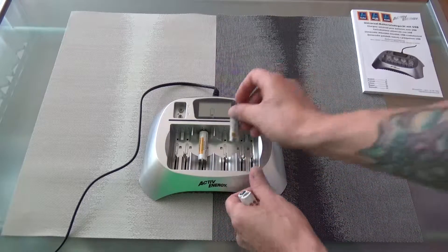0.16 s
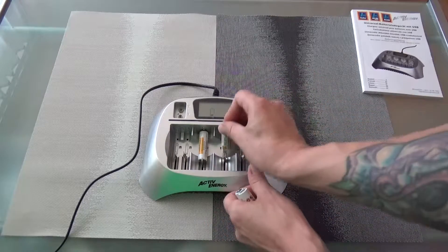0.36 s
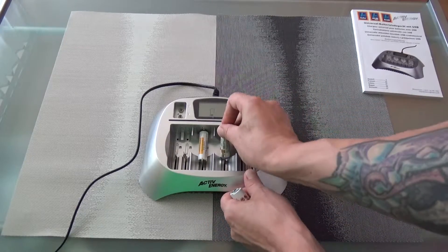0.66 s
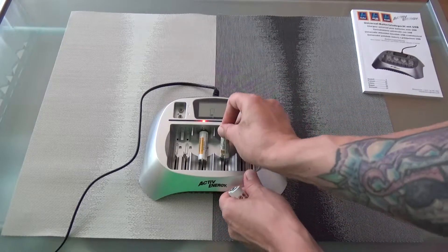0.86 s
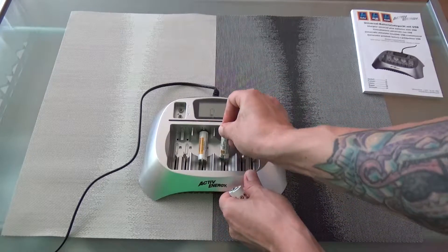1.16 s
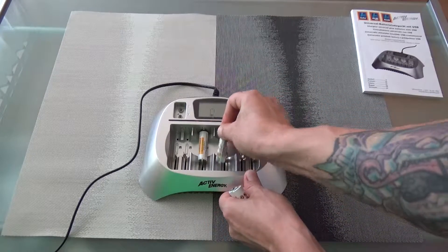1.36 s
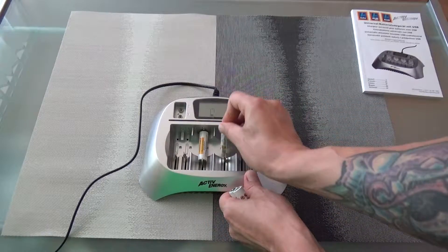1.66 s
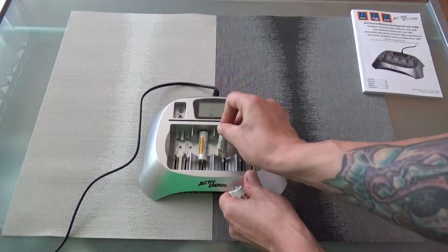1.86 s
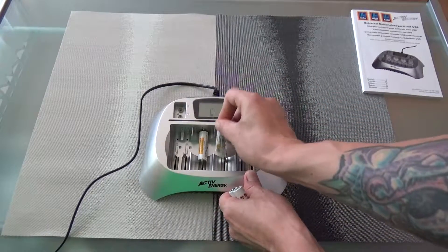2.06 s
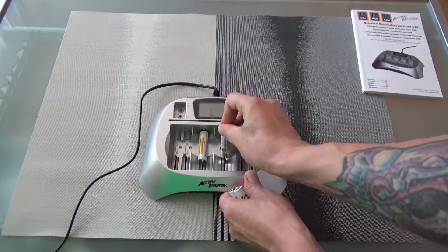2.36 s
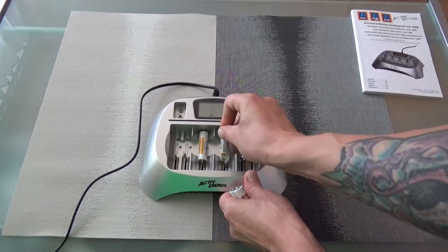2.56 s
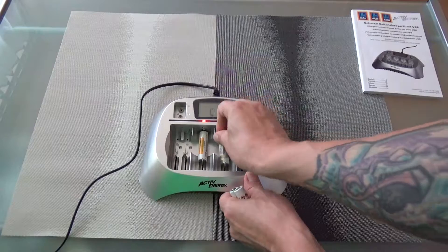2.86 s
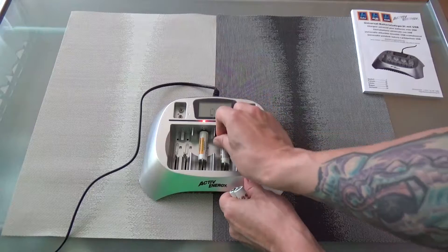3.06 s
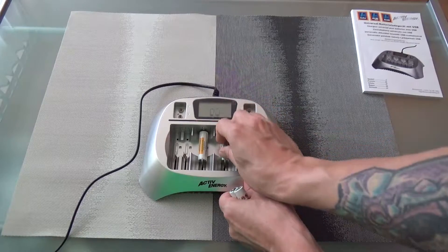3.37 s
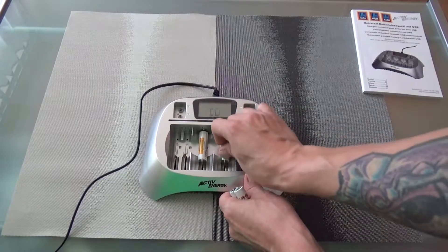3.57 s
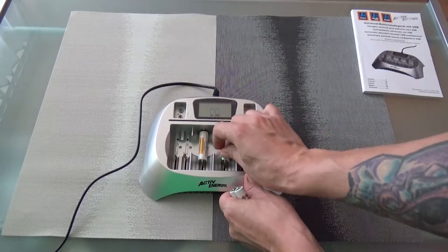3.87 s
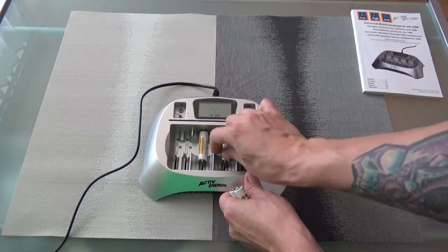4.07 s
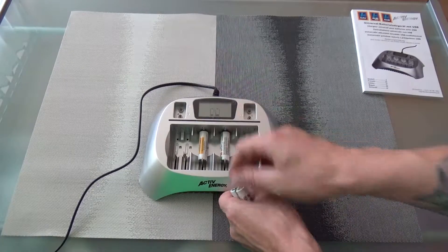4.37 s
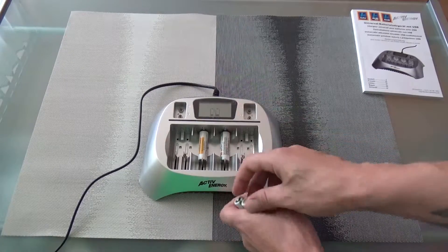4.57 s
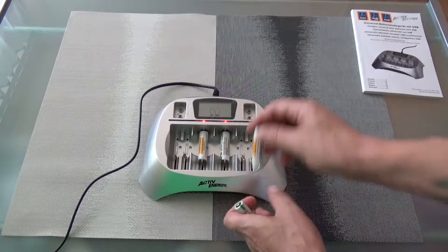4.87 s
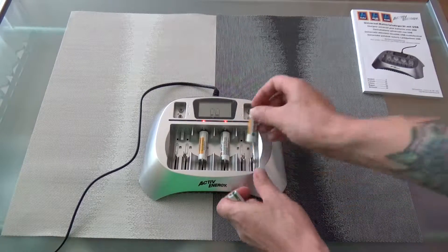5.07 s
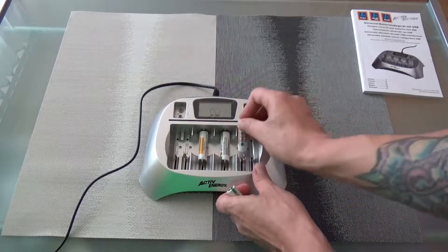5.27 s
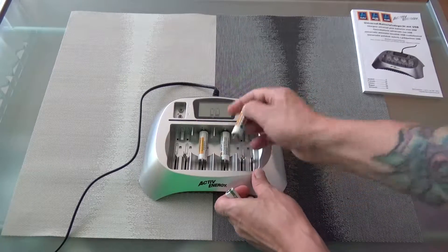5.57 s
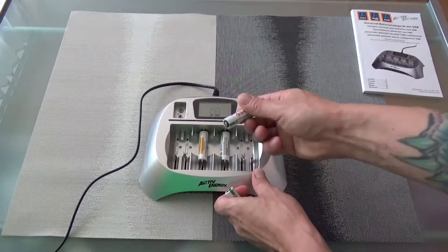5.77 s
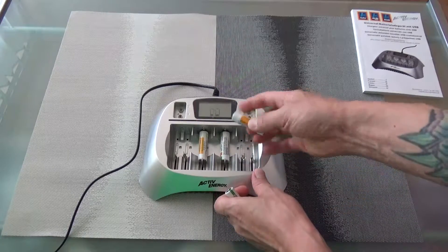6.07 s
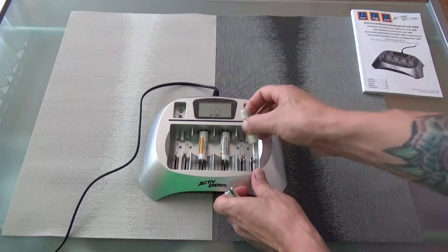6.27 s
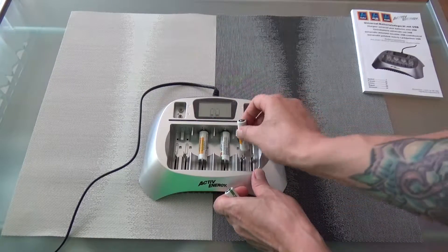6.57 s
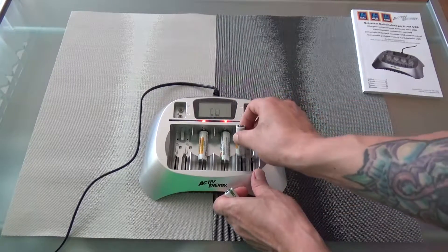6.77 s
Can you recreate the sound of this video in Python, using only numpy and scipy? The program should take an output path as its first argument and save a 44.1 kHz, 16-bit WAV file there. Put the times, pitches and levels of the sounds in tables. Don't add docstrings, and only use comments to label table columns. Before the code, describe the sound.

Close plastic and metal clacks as cells snap into a charger indoors, first in a busy cluster, then sparse handling and a final hard clack.

```python
import sys
import numpy as np
from scipy import signal
from scipy.fft import rfft, irfft, next_fast_len
from scipy.io import wavfile
from scipy.ndimage import uniform_filter1d, map_coordinates

SR = 44100
rng = np.random.default_rng(int(sys.argv[2]) if len(sys.argv) > 2 else 0)


def pcm_store(signal):
    levels = np.round(np.clip(np.atleast_2d(signal), -1, 1) * 32767)
    wavfile.write(sys.argv[1], SR, levels.astype(np.int16).T)


def natural_amplitude(level_db):
    exponent = np.asarray(level_db, float) / 20
    return 10 ** exponent


N = 304731
TIME = np.arange(N) / SR

# f/Hz, t60/s, level/dB
TABLE_MODES = [(215, 0.041, -3), (245, 0.15, -7), (285, 0.14, -4), (335, 0.09, -1.5), (380, 0.08, -4.5),
               (402.3, 0.068, -5), (476.4, 0.047, -1.5), (658, 0.048, -7.5)]
# f/Hz, density/dB per Hz
SPRING_COLOUR = [(4000, -19), (7000, -33), (10000, 9), (13000, 1), (16000, -1)]


def unit(x):
    return x / np.sqrt(np.mean(x ** 2) + 1e-20)


def peak_one(x):
    return x / np.max(np.abs(x))


def place(track, s, sound):
    track[round(s * SR):][:len(sound)] += sound


def along(points, hz, column=1):
    points = np.transpose(points)
    return np.interp(np.log(hz + 1), np.log(points[0] + 1), points[column])


def curves(rows, outside=None):
    s, *columns = np.transpose(rows)
    return [np.interp(TIME, s, column, outside, outside) for column in columns]


def wobble(rate):
    return map_coordinates(rng.standard_normal(int(N * rate / SR) + 4), [TIME * rate])


def filtered(x, response):
    m = next_fast_len(N + SR // 2)
    return irfft(rfft(x, m) * response(np.fft.rfftfreq(m, 1 / SR)), m)[..., :N]


def tone(hz):
    return np.sin(2 * np.pi * np.cumsum(hz) / SR)


def noise(spectrum, lo_hz, hi_hz):
    def band(hz):
        return natural_amplitude(along(spectrum, hz)) / (1 + (lo_hz / (hz + 1)) ** 4) / (1 + (hz / hi_hz) ** 4)
    return unit(filtered(rng.standard_normal(N), band))


def ringing(modes, t, slower, scatter_db, attack):
    hz, t60, db = np.transpose(modes)[:, :, None]
    chance = rng.standard_normal((3, len(modes), 1))
    level = natural_amplitude(db + scatter_db * chance[0] - 60 * t / (t60 * slower))
    pitch = hz * (1 + scatter_db / 100 * chance[1])
    ring = np.sum(level * np.sin(2 * np.pi * pitch * t + chance[2]), 0)
    return peak_one(ring * (1 - np.exp(-t / attack)))


def dying(stock, t, t60, attack):
    burst = stock[rng.integers(N - len(t)):][:len(t)]
    return peak_one(burst * natural_amplitude(-60 * t / t60) * (1 - np.exp(-t / attack)))


def contacts():
    # t/s, level/dB, loudest shell mode f/Hz, slider/dB, spread/dB
    blow_rows = [(0.469, -12, 2600, -6.5, 3.5), (0.497, -16.5, 3400, -18, 3.5), (0.742, -17, 1700, -14, -6),
                 (0.784, -18, 1600, -16.5, -2.5), (0.808, -19, 1110, -0.5, -5.5),
                 (1.005, -20.5, 1510, -12.5, -6.5), (1.336, -21.5, 2000, -12, 11),
                 (1.347, -11.5, 1965, 3, -6), (1.494, -13.5, 1890, -24, -5),
                 (1.558, -15.5, 2060, -1.5, -0.5), (1.747, -10, 1750, -9, 1), (1.761, -17, 1700, 1.5, 6.5),
                 (1.878, -14.5, 2550, -1, 7.5), (1.891, -9, 2030, -8, -4), (1.969, -15.5, 1620, -28, .5),
                 (2.081, -13, 2100, -12.5, 1.5), (2.31, -10, 1976, -13.5, 0),
                 (2.543, -16.5, 1250, -10.5, -5), (2.97, -19, 2300, -13.5, -5),
                 (3.005, -12.5, 980, -6.5, 0), (3.2235, -17, 2150, -6.5, -5),
                 (5.226, -19.5, 1315, -8.5, -3.5), (6.783, -10, 1760, -9, 4), (6.8675, -14, 1850, -10, 0)]
    # t/s, level/dB, f/Hz, slider/dB
    chatter_rows = [(0.471, -17.5, 1830, -2), (0.744, -24, 1170, -14), (0.507, -17.5, 890, -4),
                    (0.514, -21, 1045, -21), (1.343, -15, 1690, -4.5), (1.354, -15, 2100, 3.5),
                    (1.554, -16.5, 2470, -9), (1.579, -20, 1800, -21.5), (1.752, -15, 2460, -0.5),
                    (1.757, -16, 1950, 4.5), (1.769, -22, 2100, -29), (2.307, -17, 1900, -5.5),
                    (3.019, -24, 1300, -30), (6.79, -12, 1840, -8), (6.797, -17, 1150, -19),
                    (6.8695, -10, 1650, -13), (6.8725, -15, 1500, -12), (6.801, -21, 1200, -10),
                    (3.225, -22, 1090, -20), (2.544, -18, 1260, -20), (1.356, -12, 2300, 6)]
    # t/s, level/dB, f/Hz, slider/dB
    tap_rows = [(0.181, -40.5, 3000, -6), (0.186, -43, 2320, -6), (0.361, -41.5, 1790, -4.5),
                (0.68, -37, 1600, -24.5), (1.184, -35.5, 1000, -12.5), (2.482, -30, 2480, -1.5),
                (2.72, -39.5, 1520, -2), (2.817, -33, 1070, 1.5), (3.187, -35, 1050, -10),
                (3.317, -36, 1920, -3.5), (3.483, -43.5, 1030, -2), (3.509, -41, 1730, -4),
                (3.942, -51, 1030, -7), (4.285, -36, 1290, -16), (4.389, -41.5, 1340, 1),
                (4.405, -46, 1230, -13), (4.708, -48, 860, -3), (5.274, -29.5, 1480, -2),
                (5.596, -37, 1080, -25), (6.4, -35.5, 1400, -4.5), (6.432, -50, 885, -22),
                (6.599, -45, 1550, -4)]
    # t/s, level/dB
    tick_rows = [(.655, -40), (.733, -45), (1.076, -54), (1.098, -47), (1.178, -51), (1.253, -52.5),
                 (1.326, -33.5), (1.865, -33), (2.288, -44), (3.164, -36.5), (3.205, -42), (.465, -32),
                 (1.744, -36), (3.222, -40), (5.22, -56), (5.26, -46), (2.54, -39), (1.002, -44),
                 (2.898, -35), (6.78, -33)]
    hard = []
    for s, db, hz, bright_db, spread_db in blow_rows:
        thud_db = -40 + 0.94 * (db + 12.5) - db
        hard.append((s, db, hz, bright_db, thud_db, spread_db))
    loose = [(*row, -26, -6.5) for row in chatter_rows]
    soft = [(*row, -23.5, -1.5) for row in tap_rows]
    light = [(s, db, 1700, -9, -25, -2) for s, db in tick_rows]
    return hard + loose + soft + light


def hollows(hz):
    # f/Hz, width/Hz, gain/dB
    slot_bands = [(1080, 250, 2), (1850, 350, 2), (3400, 700, 3)]
    return natural_amplitude(sum(db / (1 + (2 * (hz - centre) / width) ** 2) for centre, width, db in slot_bands))


def table_flexing():
    # t/s, level/dB, f/Hz
    bump_rows = [(0.473, -34.5, 145.5), (0.748, -37.5, 132), (1.01, -46.5, 142.4), (1.348, -46, 168),
                 (1.42, -38, 153), (1.765, -36.5, 116), (2.079, -62, 168), (2.544, -41, 158.7),
                 (3.01, -38, 156), (3.211, -52, 112), (5.279, -38, 113), (6.791, -40, 141),
                 (.512, -34.5, 328),
        (.812, -36, 335),
        (.81, -38, 280),
        (1.009, -43.5, 291),
        (2.312, -35.5, 285),
        (2.546, -38, 277),
        (2.546, -39, 245),
        (3.006, -34, 957),
    ]
    out, t = np.zeros(N + SR), np.arange(SR // 5) / SR
    for s, db, hz in bump_rows:
        slower = np.clip(0.54 * (300 / hz) ** 0.13, .2, .75)
        place(out, s, natural_amplitude(db - 1.0) * ringing([(hz, .2, 0)], t, slower, scatter_db=0, attack=0.0022))
    return out


def panels():
    # t/s, level/dB, f/Hz, t60/s
    ring_rows = [(.742, -40, 650, .05), (.786, -37, 770, .08), (.81, -38, 1082, .45), (.87, -59, 4495, .4),
                 (1.008, -43, 1040, .1), (2.971, -30, 880, .03), (1.095, -51, 1000, .08),
                 (2.545, -27, 1211, .05), (2.545, -30, 1303, .06), (2.546, -43, 603, .15),
                 (2.546, -38, 310, .2), (3.226, -28, 1093, .05), (3.227, -39, 781, .06),
                 (3.27, -46, 420, .08), (6.805, -33, 1030, .3), (6.805, -29, 1860, .3),
                 (6.8, -36, 3200, .2), (6.874, -31, 1030, .08)]
    out, t = np.zeros(N + SR), np.arange(SR // 5) / SR
    for s, db, hz, t60 in ring_rows:
        pair = [(hz, 1, 0), (hz * 1.025, .6, -5)]
        place(out, s, natural_amplitude(db) * ringing(pair, t, t60, scatter_db=0, attack=.002) * (1 - t / t[-1]))
    return out


def knocks():
    # f/Hz, density/dB per Hz
    shell_colour = [(300, -30.5), (700, -8.5), (1000, -1), (1800, 2.5), (2600, 0), (3600, -2),
                    (4600, -10.5), (6000, -24)]
    # f/Hz, density/dB per Hz
    slider_colour = [(3500, -13), (4800, -4), (5900, 1), (7000, -4), (8500, -10), (11000, -12.5),
                     (14000, -21.5), (16000, -33.5)]
    shell = filtered(noise(shell_colour, 260, 6100), hollows)
    slider = noise(slider_colour, 2700, 26000)
    out, low, blows = panels(), table_flexing(), np.zeros((2, N))
    t = np.arange(SR // 5) / SR
    for s, db, hz, bright_db, thud_db, spread_db in contacts():
        body = dying(shell, t, .017, attack=.001)
        body = body + .75 * ringing([(hz, .015, 0)], t, 1, scatter_db=0, attack=.0005)
        rattle = dying(slider, t, .013, attack=.0009)
        thud = ringing(TABLE_MODES, t, 0.83, scatter_db=3.0, attack=0.0053)
        place(out, s, natural_amplitude(db - 2.5) * (body + natural_amplitude(bright_db + 3) * rattle))
        place(low, s, natural_amplitude(db + thud_db) * thud)
        blows[:, round(s * SR)] += natural_amplitude(db + spread_db + np.array([21, 18.5 + bright_db]))

    def all_round(hz):
        return natural_amplitude([along(shell_colour, hz) - 1.4, along(slider_colour, hz)]) * [hollows(hz), hz ** 0]
    even = filtered(blows, all_round).sum(0)
    return (out + low)[:N], even + low[:N] + .2 * out[:N]


def thuds():
    # t/s, level/dB
    thud_rows = [
        (.5, -30.5),
        (.785, -37),
        (.809, -36),
        (1.006, -39),
        (1.44, -34),
        (1.97, -37.5),
        (2.308, -40),
        (2.544, -32),
        (2.818, -46.5),
        (5.277, -54),
    ]
    # t/s, level/dB
    snap_rows = [(0.469, -43), (1.349, -15.5), (1.558, -26), (1.879, -23), (2.081, -44), (2.896, -31),
                 (3.004, -32), (4.389, -41), (5.228, -27.5), (5.26, -46), (5.275, -33.5)]
    out, t, spring = np.zeros(N + SR), np.arange(SR // 5) / SR, noise(SPRING_COLOUR, 3000, 20000)
    for s, db in thud_rows:
        place(out, s, natural_amplitude(db) * ringing(TABLE_MODES, t, 0.98, scatter_db=4.5, attack=0.0049))
    for s, db in snap_rows:
        place(out, s, natural_amplitude(db) * dying(spring, t, 0.01, attack=0.00037))
    return out[:N]


def clinks():
    # t/s, level/dB, f/Hz, upper mode/dB, t60/s
    clink_rows = [(0.18, -28, 5800, -10, 0.0025), (0.1834, -46, 5700, -13, 0.008),
                  (0.1878, -34.5, 5600, -11, 0.0037), (2.895, -48, 6300, -1, 0.007),
                  (2.8959, -22, 6230, -11, 0.0066), (2.903, -31, 5800, -19, 0.012),
                  (4.5003, -19, 5650, -13, 0.005), (4.5035, -38, 5500, -14, .006),
                  (4.548, -48, 5500, -14, .008), (4.516, -47, 5500, -14, 0.009),
                  (4.5734, -48, 5400, -15, 0.01), (5.5278, -55, 5650, -12, 0.009),
                  (5.558, -54, 5430, -21, 0.009), (6.5774, -53, 5350, -3, 0.009)]
    out, wide, t = np.zeros(N + SR), np.zeros(N + SR), np.arange(SR // 8) / SR
    for s, db, hz, upper_db, t60 in clink_rows:
        can = [(hz, 1, 0), (hz * 1.25, .5, -13), (10300, .8, upper_db + 3.5), (11600, .5, upper_db - 3),
               (3350, .8, -30), (1870, 1.2, -17)]
        neighbours = [(hz * .93, 1, -3), (hz * 1.12, 1, -3)]
        gain = natural_amplitude(db + 2.5)
        place(out, s, gain * ringing(can, t, max(t60, .004), scatter_db=0, attack=.0012))
        place(wide, s, gain * ringing(can + neighbours, t, .005, scatter_db=1, attack=.0008))
    return out[:N], wide[:N]


def scrapes():
    # f/Hz, density/dB per Hz
    dull_colour = [(180, -56), (300, -18), (566, -22.5), (929, -5.5), (2000, -4.5), (3230, 0), (5000, -4.5),
                   (7000, -28)]
    # f/Hz, density/dB per Hz
    bright_colour = [(2350, -22), (3500, -2), (4750, -7), (5900, -1.5), (7000, -6), (8300, -14),
                     (13900, -20), (16000, -32)]
    # start t/s, length/s, level/dB, brightness/dB, share spent swelling/0-1
    stroke_rows = [(0.368, 0.11, -50.5, -4, 0.77), (2.505, .04, -46, -10, .6), (2.769, 0.034, -56.5, 0, .3),
                   (2.819, 0.092, -46, 0, 0.27), (2.889, 0.052, -47, 8.5, 0.08),
                   (3.025, 0.066, -55, -17, .1), (3.119, 0.062, -48.5, 1, 0.68), (4.366, 0.032, -58, 4, .8),
                   (4.403, 0.027, -56.5, 4, 0.06), (5.284, 0.035, -49.5, 4, 0.5),
                   (5.333, 0.09, -54, -5, 0.88), (5.561, .075, -60, 0.5, 0.03), (5.72, .03, -67, 7, .5),
                   (6.536, 0.061, -56, -3, .7), (6.723, 0.046, -48, -3.5, 0.64)]
    # t/s, level/dB
    shove_rows = [
        (1.355, -30),
        (1.366, -29),
        (1.374, -22.5),
        (1.41, -23),
        (1.44, -23.5),
        (1.458, -25),
        (1.465, -29),
        (1.49, -33),
        (1.53, -35.5),
    ]
    edge_db = -19.5
    grainy = natural_amplitude(3.3 * wobble(900) + .6 * wobble(83))
    low = unit(grainy * noise(dull_colour, 630, 3640))
    high = unit(grainy * noise(bright_colour, 2330, 20000))
    skin = natural_amplitude(-6.5) * unit(grainy * noise(SPRING_COLOUR, 6000, 20000))
    paths = []
    for s, length, db, bright, swell in stroke_rows:
        peak_s = s + np.clip(swell, .02, .98) * length
        stroke = [(s, db + edge_db, bright), (peak_s, db, bright), (s + length, db + edge_db, bright)]
        paths.append((stroke, high + skin))
    hardest = max(db for s, db in shove_rows)
    shove = [(s, db, 1.5 + 0.3 * (db - hardest)) for s, db in shove_rows]
    paths.append((shove, high))
    out = np.zeros(N)
    for path, bright_part in paths:
        db, bright_db = curves(path, -150)[0], curves(path)[1]
        out += uniform_filter1d(natural_amplitude(db - 2.0), size=200) * (low + natural_amplitude(bright_db) * bright_part)
    return out


def squeak():
    # t/s, pressure/0-1
    press_rows = [
        (4.55, 0),
        (4.6, .7),
        (4.645, 1),
        (4.68, .6),
        (4.71, .3),
    ]
    # f at rest/Hz, f gained at full pressure/Hz
    skin_tones = [(7900, 550), (10000, 600), (10400, 1800)]
    pressure, = curves(press_rows)
    tones = np.zeros(N)
    for hz, gain_hz in skin_tones:
        tones += natural_amplitude(6 * wobble(35)) * tone(hz + gain_hz * pressure + 150 * wobble(200))
    touching = (TIME > press_rows[0][0]) * (TIME < press_rows[-1][0])
    return natural_amplitude(-91 + 8 * (1.5 + pressure)) * tones * touching


def creak():
    # t/s, level/dB
    creak_rows = [
        (.358, -62),
        (.4, -64),
        (.44, -61),
        (.466, -58),
    ]
    level = uniform_filter1d(natural_amplitude(curves(creak_rows, -150)[0]), size=100)
    return level * natural_amplitude(3 * wobble(60)) * tone(1855 + 70 * wobble(300))


def room(x, count=4, gap=.006):
    # f/Hz, t60/s, level/dB
    tail_rows = [(145, 0.91, -5.5), (414, 0.28, 10.5), (1000, 0.36, 4), (2740, 0.43, -0.5),
                 (6460, 0.41, -2.5), (13600, 0.16, -3)]
    out, turn = np.zeros(N), (TIME * 6).astype(int) % count
    for k in range(count):
        hz, t, z = signal.stft(rng.standard_normal(int(.7 * SR)), SR, nperseg=256)
        decay = along(tail_rows, hz, column=2)[:, None] - 60 * t / along(tail_rows, hz)[:, None]
        tail = signal.istft(z * natural_amplitude(decay), SR, nperseg=256)[1]
        tail = tail * (1 - np.exp(-(np.arange(len(tail)) / SR / gap) ** 2))
        out += signal.fftconvolve(x * (turn == k), tail / np.linalg.norm(tail))[:N]
    return out


def background():
    # f/Hz, density/dB per Hz
    air_colour = [(20, -39), (45, -20), (62, -13), (80, -21), (100, -3.5), (125, -2), (160, -4.5),
                  (200, -6.5), (262, -6.5), (300, -3.5), (420, -5.5), (530, -11), (600, -16), (790, -12)]
    # t/s, level/dB
    air_rows = [(0, -58.5), (.3, -59), (.42, -55), (.92, -50.5), (1.11, -54), (1.5, -53), (2.13, -59),
                (2.79, -51.5), (3.04, -43.5), (3.37, -55), (3.8, -56), (4.2, -54), (5, -55), (5.7, -57.5),
                (6.2, -54), (6.7, -55), (6.91, -49)]
    # f/Hz, density/dB per Hz
    hiss_colour = [(470, -31.5), (800, -0.5), (1260, -15), (1520, -2.5), (1790, -6.5), (2110, -7.5),
                   (2550, -10.5), (12100, -15), (13300, -14), (16300, -14)]
    # t/s, half length/s, level/dB
    pass_rows = [
        (.58, 0.13, -57),
        (1.11, .06, -60),
        (1.33, 0.043, -60),
        (2.558, .08, -66),
        (3.374, 0.046, -56),
        (3.998, 0.33, -55.5),
        (4.755, 0.15, -58),
        (5.5, .12, -66),
    ]
    # f/Hz, level/dB
    whine_rows = [(8640, -83.5), (9119, -80), (13248, -85), (15628, -86)]
    rumble_db, = curves(air_rows)
    rumble = natural_amplitude(rumble_db - 1.5 + 1.3 * wobble(8.3)) * noise(air_colour, 20, 1200)
    hiss_db = -63.5 + 0.35 * (rumble_db - np.median(rumble_db))
    hiss = natural_amplitude(hiss_db) * noise(hiss_colour, 1080, 22000)
    swell = natural_amplitude(-75.5) + sum(natural_amplitude(db) * np.exp(-((TIME - s) / half) ** 2) for s, half, db in pass_rows)
    hum = natural_amplitude(-3.5) * swell * tone(62 + 2.5 * wobble(1))
    whine = sum(natural_amplitude(db + 4 + .7 * wobble(5)) * tone(hz + 4 * wobble(20)) for hz, db in whine_rows)
    return rumble + hiss + hum + whine


def stereo(mid, side):
    # f/Hz, level/dB
    apart_rows = [(60, -18), (250, -27), (500, -17.5), (1000, -27.5), (2500, -26.5), (4500, -18),
                  (9500, -14), (12000, -19)]
    # f/Hz, level/dB
    lean_rows = [(60, 2.3), (200, 2), (500, .8), (1000, .1), (15000, 0)]
    side = filtered(side, lambda hz: natural_amplitude(along(apart_rows, hz)))
    ports = np.array([mid + side, mid - side])
    return filtered(ports, lambda hz: natural_amplitude(along(lean_rows, hz) * [[.5], [-.5]]))


def scene():
    direct, spread = knocks()
    steel, wide = clinks()
    others = scrapes() + squeak() + thuds() + creak()
    sources = np.array([direct + steel + others, spread + .28 * wide + others])
    near, spread = filtered(sources, lambda hz: 1 / (1 + (85 / (hz + 1)) ** 6))
    other_port = natural_amplitude(-.5) * room(near, count=1, gap=.0005) + background()
    return stereo(near + natural_amplitude(-6.0) * room(spread) + background(), other_port)


def band_limit(x):
    return signal.sosfilt(signal.butter(12, 16470, fs=SR, output="sos"), x)


def record(dry):
    held = dry / (1 + np.abs(dry / .42) ** 4) ** .25
    limited = filtered(held, lambda hz: 1 / (1 + (hz / 15800) ** 90))
    return band_limit(limited)


dry = scene()
out = record(dry)
pcm_store(out)
```